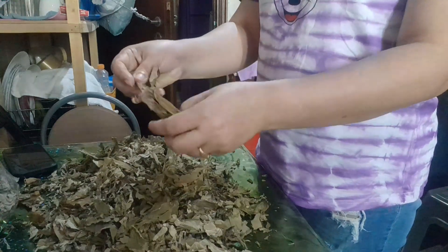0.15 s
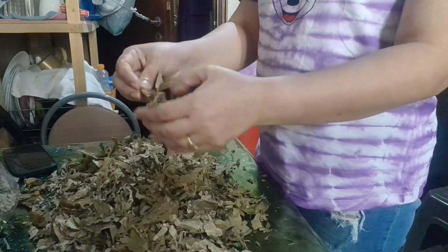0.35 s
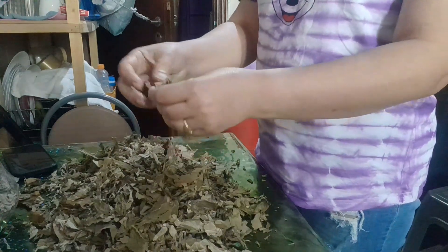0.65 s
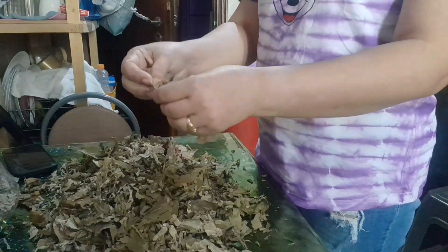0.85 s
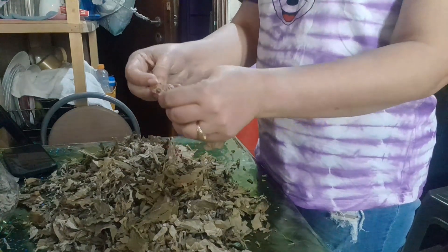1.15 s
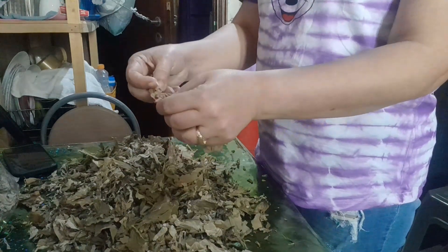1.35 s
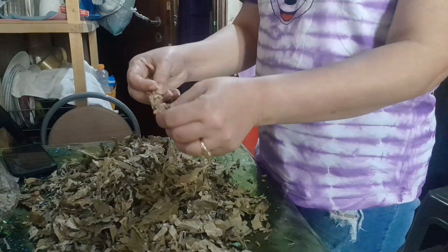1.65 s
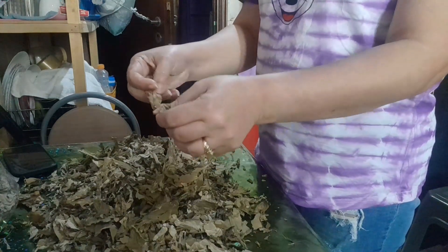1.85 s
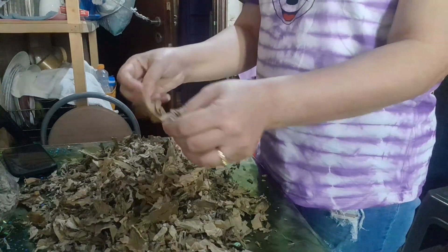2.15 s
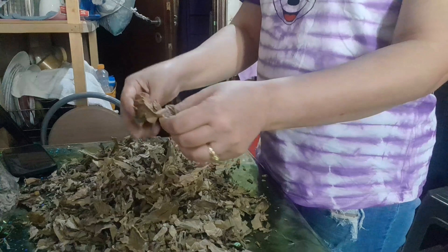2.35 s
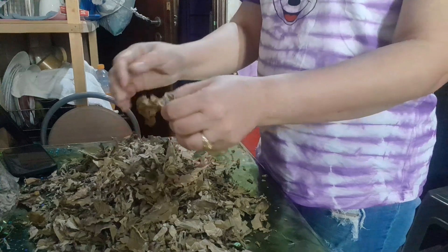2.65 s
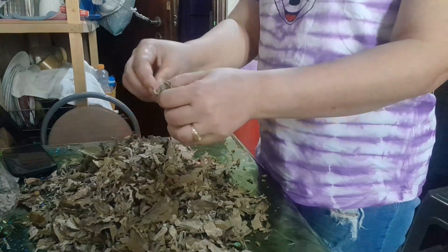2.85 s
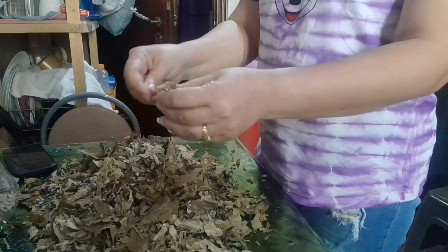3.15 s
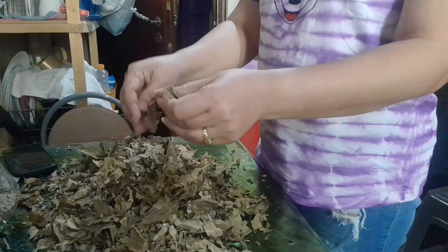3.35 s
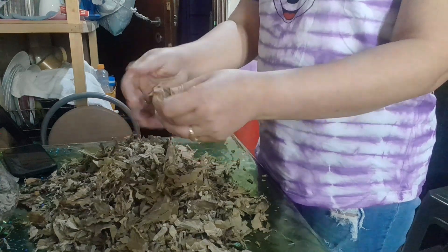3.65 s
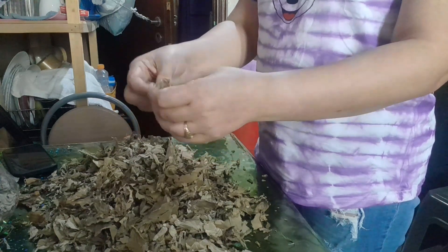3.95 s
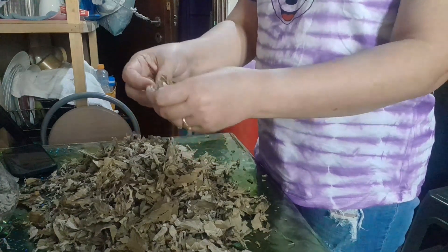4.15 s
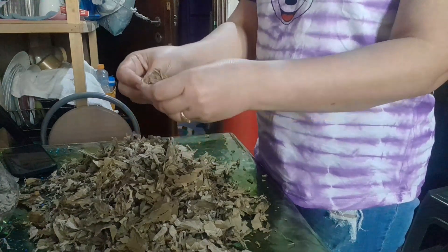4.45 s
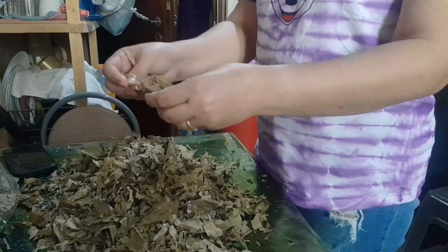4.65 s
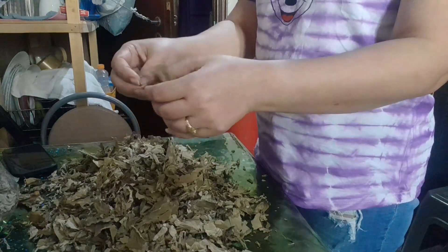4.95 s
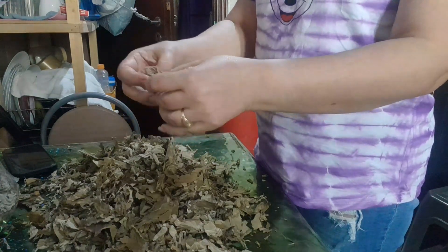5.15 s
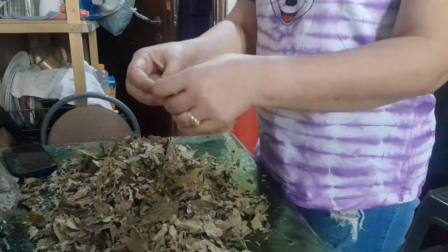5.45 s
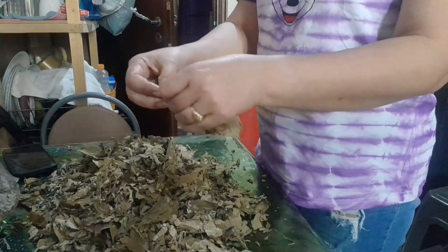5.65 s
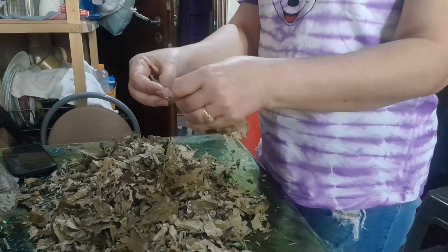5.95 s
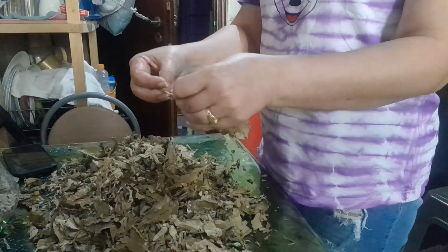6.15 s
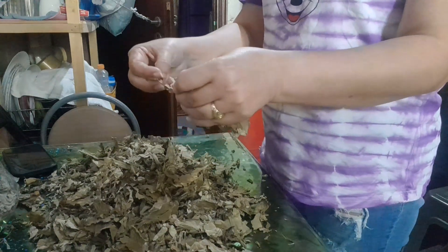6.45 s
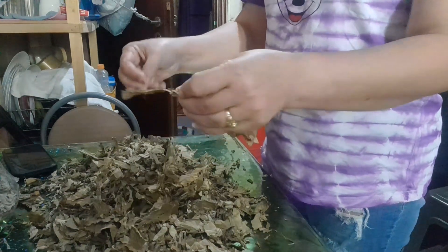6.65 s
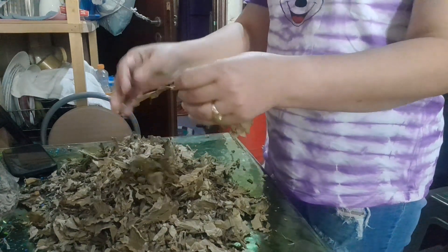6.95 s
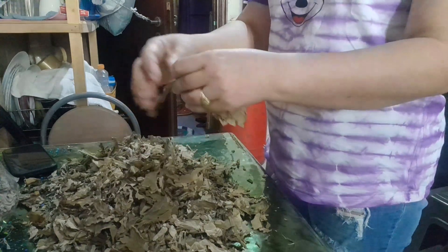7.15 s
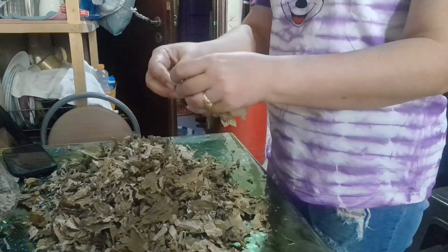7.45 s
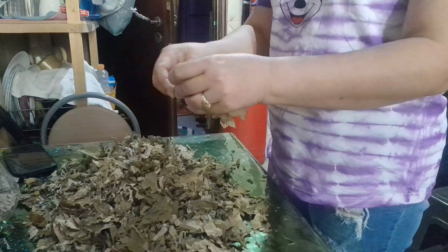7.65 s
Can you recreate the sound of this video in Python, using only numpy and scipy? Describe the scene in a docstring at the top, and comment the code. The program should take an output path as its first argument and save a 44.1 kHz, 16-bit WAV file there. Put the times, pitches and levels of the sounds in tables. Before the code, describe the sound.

Close to the microphone, fingers knead and tear dry leaves over a heap. Sharp vein snaps start at once, then bright crackling swells into short tearing pulls, with a dense crunchy burst near two seconds. Quieter rustling and soft rubbing follow, then more snaps, crunches and rips. A fan drones low throughout in a small, hard kitchen.

```python
"""Dry leaves are torn and crumbled by hand over a heap on a kitchen table, close to the microphone.
A fan drones low throughout; at once the fingers knead the leaf and the first veins snap in sharp cracks.
Pulls follow, each building up a swarm of tiny random cracks until the brittle blade parts.
Later, dull grainy swishes rub off crumbs, sudden rips burst out and folded wads crunch, among more kneading
and pulls to the end. Shaped noise makes every sound, and the small hard room answers every crack."""
import sys
import numpy as np
from scipy import signal
from scipy.fft import rfft, irfft, next_fast_len
from scipy.io import wavfile

SR = 44100
rng = np.random.default_rng(int(sys.argv[2]) if len(sys.argv) > 2 else 0)


def transcribe(u):
    """Save the signal u as a 16-bit wav file named by the first command-line argument.

    u: samples, shape (n,) or (channels, n), limited to [-1, 1]; the rate is SR.
    q: integer samples, one column per channel.
    """
    v = np.clip(np.atleast_2d(u).T, -1, 1)
    q = np.round(v * 32767).astype(np.int16)
    wavfile.write(sys.argv[1], SR, q)


N = 343539
TIME = np.arange(N) / SR
PADDED = next_fast_len(N + SR, True)
BINS = np.arange(PADDED // 2 + 1) * SR / PADDED   # frequencies of the spectrum [Hz]

# All levels in the tables are relative: later gains set the balance.
# Spectrum of the fan's rumble: (frequency [Hz], level [dB])
FAN_SPECTRUM = [(12, -45), (20, -19.5), (59, -15.5), (82, -7.5), (123, 4), (166, -7.5), (235, -11),
                (256, -15.5), (383, -29.5), (410, -27), (448, -28.5), (489, -28.5), (718, -26), (1000, -25),
                (1300, -37), (1690, -76.5), (2860, -120)]
# Spectrum of the hiss of air: (frequency [Hz], level [dB])
AIR_SPECTRUM = [(900, -20), (1200, 5), (1500, 6.5), (2000, -5), (3000, -32), (6000, -10), (15000, -5.5)]
# Room resonances fed by the fan: (frequency [Hz], width [Hz], level [dB])
ROOM_MODES = [(96.6, 18.8, -47.5), (113, 13, -63.5), (125.8, 13.5, -54.5), (147.7, 4.7, -52.5),
              (183.2, 5.6, -56), (227.7, 8.8, -56), (288.4, 6.6, -64.5), (304, 12, -69.5), (367.6, 54, -68)]
# Left-right likeness of the diffuse field: (frequency [Hz], likeness [1 = alike])
FIELD_LIKENESS = [(40, 1), (150, 0.94), (300, 0.73), (600, 0.55), (1200, 0.061), (4000, 0.32)]
# Decay of the kitchen's echoes: (frequency [Hz], reverberation time [s])
REVERBERATION = [(300, 0.25), (2000, 0.39), (6000, 0.32), (15000, 0.24)]
# Left-right difference of the microphone ports: (frequency [Hz], level [dB])
PORT_DIFFERENCE = [(1000, -0.5), (2500, -0.5), (5000, -0.5), (9000, 3.0), (13000, -5.5), (16000, -2.0)]
# Fingers rubbing crumbs off:
# (time [s], rise [s], hold [s], fade [s], swish level [dB], level of the chafed edge's ring [dB])
RUBBING = [(1.828, 0.06, 0.025, 0.038, -65, -62), (2.444, 0.075, 0.037, 0.047, -58, -62.5),
           (3.103, .015, 0.027, .015, -61, -73), (3.243, 0.019, 0.039, .04, -54, -68.5),
           (5.398, 0.026, 0.066, 0.097, -76, -70.5), (6.968, .018, 0.032, 0.034, -68.5, -90)]
# Spectrum of the sliding skin: (frequency [Hz], level [dB])
SKIN_SPECTRUM = [(150, -18), (400, 3.5), (900, 5.5), (1500, 2.5), (2100, -12.5), (3000, -24.5), (6000, -27),
                 (15000, -41)]
# Folded wads giving way: (time [s], fade [s], level [dB])
WAD_CRUNCHES = [(1.953, 0.019, -39), (4.121, 0.019, -38.5), (4.554, 0.023, -39.5), (6.104, 0.027, -50)]
# Spectrum of the crushed wad: (frequency [Hz], level [dB])
WAD_SPECTRUM = [(100, -17.5), (200, 1.5), (320, 4), (450, 1), (700, -4), (1100, -1), (1500, -2.5),
                (1900, 1), (2400, -2.5), (4500, -5), (6500, -9.5), (15000, -19)]
# Veins snapping: (time [s], peak level [dB], blade share [dB], blade pitch [Hz],
# pitch of the broken edge [Hz], left-right difference [dB])
VEIN_SNAPS = [(0.017, -37, -16, 3140, 4980, 4), (0.0383, -38, -15, 1200, 12600, -2),
              (0.0803, -24, -11.5, 2200, 5300, -1), (.852, -34, -17, 1840, 12700, -1),
              (1.0916, -51, -26, 2800, 11800, -4), (1.159, -35.5, -9, 3130, 4700, -6),
              (1.4683, -35, -38, 2800, 13800, -6), (1.7771, -35, -22.5, 2400, 13700, 3),
              (1.9229, -31, -16, 3500, 4200, -2), (1.932, -32, -27, 3050, 9300, -9),
              (1.947, -23.5, -27, 1170, 10600, -1), (1.9571, -32, -25, 2040, 14500, -11),
              (1.988, -26.5, -36, 2960, 13200, 3), (2.165, -34, -22, 3270, 11800, -1),
              (2.3542, -50.5, -28, 1220, 7640, -4), (3.094, -29, -25, 2880, 14300, -0.5),
              (4.317, -39, -6.5, 2330, 11900, 5), (4.3845, -32.5, -25, 1300, 8300, -2),
              (4.554, -31, -12, 1140, 4200, 4), (4.561, -34, -15, 2850, 13700, -9),
              (4.648, -30.5, -16.5, 3130, 5900, 0.5), (5.682, -41, -40, 1290, 12100, 0),
              (5.7788, -41, -13.5, 3130, 13400, -1), (6.043, -47, -19, 1280, 14400, -2),
              (6.1046, -35, -23, 3380, 4730, -2), (6.5425, -25, -41, 3480, 14300, 1.5)]
# Spectrum of the blade's knock as a vein snaps: (frequency [Hz], level [dB])
KNOCK_SPECTRUM = [(300, 14), (700, -22), (1100, 4.5), (1450, 2), (1900, 4.5), (2300, 0.5), (2800, 8.5),
                  (3600, -3.5), (5000, -13.5), (8000, -46), (15000, -37)]
# Fingers kneading and folding the leaf:
# (time [s], length [s], fine cracking level [dB], flexing level [dB])
KNEADING = [(-.02, 0.12, -50, -48), (0.167, 0.13, -49, -55), (0.354, 0.12, -60.5, -60.5),
            (0.595, 0.074, -55, -58), (0.686, 0.16, -49.5, -50.5), (0.939, 0.17, -52.5, -53.5),
            (1.195, 0.079, -55, -48), (1.292, 0.25, -63, -63), (2.369, 0.045, -60.5, -62),
            (2.495, .12, -61, -63.5), (2.868, 0.25, -54, -60), (3.087, 0.05, -53, -52),
            (3.327, .06, -69.5, -81), (3.587, 0.25, -66, -75), (3.841, 0.11, -58, -66.5),
            (3.984, 0.28, -57.5, -60.5), (4.296, 0.12, -60, -54), (4.46, 0.08, -63, -61),
            (4.565, 0.054, -45, -47), (4.688, 0.18, -57, -61), (4.94, .04, -60, -66),
            (5.003, 0.234, -58.5, -64.5), (5.388, 0.071, -64, -65), (5.579, .18, -60, -62.5),
            (5.797, 0.13, -53, -57), (6.026, .06, -64.5, -64.5), (6.498, 0.044, -49.5, -71),
            (6.542, 0.015, -47, -46), (6.975, 0.053, -64.5, -78), (7.05, 0.47, -70, -85),
            (7.336, 0.36, -57.5, -65), (7.7, 0.17, -54.5, -65.5)]
# Pulls that build up until the blade parts:
# (time [s], build-up [s], fine cracking level [dB], flexing level [dB])
BLADE_PULLS = [(.49, 0.063, -49, -52), (1.11, 0.083, -42, -45), (1.455, 0.089, -37, -46),
               (1.675, 0.06, -45.5, -53.5), (2.1, 0.063, -44.5, -51), (2.92, 0.083, -50.5, -56.5),
               (5.23, 0.061, -50, -53.5), (5.475, .04, -55.5, -59), (6.067, 0.085, -36.5, -48),
               (6.27, 0.12, -37.5, -51.5), (6.735, 0.065, -58, -93), (7.63, 0.056, -48, -69)]
# Sudden rips: (time [s], length [s], fine cracking level [dB], flexing level [dB])
SUDDEN_RIPS = [(1.929, 0.061, -43.5, -45), (4.546, 0.024, -39.5, -49), (6.101, 0.034, -43, -46),
               (6.542, .02, -40, -53)]
# Spectrum of a crack at the torn edge: (frequency [Hz], level [dB])
CRACK_SPECTRUM = [(880, -14), (1500, -16), (1940, -11.5), (2140, -35), (2590, -14), (2830, -6), (3480, -5),
                  (3920, -2.5), (5440, 0), (6430, 0), (9010, 1.5), (9850, -2), (13000, 2), (15100, 1),
                  (16000, -19)]
# Spectrum of the bending blade: (frequency [Hz], level [dB])
BLADE_SPECTRUM = [(150, -29), (300, 1), (440, 6), (650, 2), (1000, 4.5), (1400, -1), (1900, 1), (2300, 2),
                  (2850, 4), (3500, 0.5), (4800, 4), (7000, -11), (15000, -12.5)]

CUTOFF_HZ = 16000
CHAFE_HZ, CHAFE_WIDTH_HZ = 1970, 350   # ring of the rubbed edge
GRIP_S, RELEASE_S = 0.0067, 0.02   # attack and release of a kneading stroke
HELD_FINE_DB, HELD_FLEX_DB = -77, -80.5   # the leaf creaks while it is merely held
UNEVEN_DB, UNEVEN_HZ = 2.5, 7.6   # the finger pressure wavers
PULL_CURVE, SLACK_S = 0.72, 0.02   # cracking grows as this power of the stretch, then slackens
TICKS_PER_S, TICK_DB = 45, -11   # single fibres part; mean level against the swarm of cracks


def from_db(db):
    """Logarithmic level: decibels to an amplitude gain."""
    return 10 ** (np.asarray(db) / 20)


def rms_one(x):
    """Normalization: scale to unit root-mean-square."""
    return x / np.sqrt(np.mean(x ** 2) + 1e-20)


def at_hz(points, hz):
    """Logarithmic pitch scale: interpolate a table along log frequency."""
    f, value = np.transpose(points)
    return np.interp(np.log(hz + 1), np.log(f + 1), value)


def filtered(x, response):
    """Linear filtering: multiply the spectrum by a frequency response."""
    return irfft(rfft(x, PADDED) * response, PADDED)[..., :N]


def colour(x, spectrum):
    """Minimum phase: a causal filter made by folding the cepstrum; it keeps the power of white noise."""
    log_gain = np.log(rms_one(from_db(at_hz(spectrum, BINS))))
    cepstrum = irfft(log_gain, PADDED)
    cepstrum[1:PADDED // 2] *= 2
    return filtered(x, np.exp(rfft(cepstrum[:PADDED // 2], PADDED)))


def drift(rate):
    """Slow fluctuation: low-passed noise of unit spread, at half amplitude response at the rate in Hz."""
    return rms_one(filtered(rng.standard_normal(N), 1 / (1 + (BINS / rate) ** 2)))


def panned(db):
    """Level difference between channels: split it evenly over the two gains."""
    return from_db(np.array([db, -db]) / 2).reshape(2, -1)


def fading(from_s, fade_s):
    """Exponential release: full level up to a moment, then decay."""
    return np.exp(-np.clip((TIME - from_s) / fade_s, 0, 20))


def resonate(x, hz, width_hz):
    """Damped mode: a two-pole resonance that keeps the power of white noise."""
    r = np.exp(-np.pi * width_hz / SR)
    poles = [1, -2 * r * np.cos(2 * np.pi * hz / SR), r * r]
    return signal.lfilter([1, 0, -1], poles, x) * np.sqrt((1 - r * r) / 2)


def diffuse_noise():
    """Diffuse field: white stereo noise is most alike in both channels where the waves are long."""
    alike = np.clip(at_hz(FIELD_LIKENESS, BINS), -.999, .999)
    mid = filtered(rng.standard_normal(N), np.sqrt(1 + alike))
    side = filtered(rng.standard_normal(N), np.sqrt(1 - alike))
    return np.array([mid + side, mid - side]) / np.sqrt(2)


def near_noise(size, alike=0.17):
    """Partial coherence: white noise from a near source, partly shared by the two channels."""
    alike = np.clip(alike, 0, 1)
    shared = rng.standard_normal(size)
    separate = rng.standard_normal((2, size))
    return np.sqrt(alike) * shared + np.sqrt(1 - alike) * separate


def fracture_power(per_s, spread_db, clump_db, ring_s):
    """Clustered random fracture: cracks of uneven size come in clumps and decay at once; mean power 1."""
    born = rng.random(N) < per_s * from_db(clump_db * drift(25)) / SR
    sizes = from_db(spread_db * np.minimum(rng.exponential(1, N), 3.5))
    power = born * sizes ** 2 / per_s
    power = signal.lfilter([1], [1, -np.exp(-1 / (ring_s * SR))], power + 1e-18)
    return power / power.mean()


def fan():
    """Turbulence noise: a broad rumble, lifted at the room's resonances, under a faint hiss of air."""
    modes = 0
    for hz, width, db in ROOM_MODES:
        modes = modes + from_db(db) * rms_one(1 / (1 + ((BINS - hz) / width) ** 2))
    resonant = from_db(-4.0) * filtered(diffuse_noise(), modes)
    rumble = from_db(-45) * colour(diffuse_noise(), FAN_SPECTRUM)
    hiss = from_db(-77.5) * colour(diffuse_noise(), AIR_SPECTRUM)
    return (resonant + rumble) * panned(-1.53) + hiss


def reflections(x, first_s, count=8):
    """Reverberant decay: dense echoes off walls and table fade at a rate set for each band."""
    t = np.arange(SR * 2 // 3) / SR
    edges, tail = np.geomspace(100, 18000, count + 1), 0
    for low, high in zip(edges, edges[1:]):
        band_pass = signal.butter(2, [low, high], "band", fs=SR, output="sos")
        band = signal.sosfilt(band_pass, rng.standard_normal((2, len(t))))
        decay_s = at_hz(REVERBERATION, np.sqrt(low * high))
        tail = tail + band * from_db(-60 * t / decay_s)
    onset = np.clip(t / first_s - .5, 0, 1)
    tail = rms_one(tail * onset) / np.sqrt(len(t))
    return filtered(x, rfft(tail, PADDED))


def kitchen(x):
    """Changing echo paths: the mix of two reflection patterns shifts as the hands move."""
    turn = 2 * drift(2.78)
    return sum(reflections(x * share, first_s=.005) for share in (np.cos(turn), np.sin(turn)))


def fingers():
    """Friction: skin catches on crumbs, slides with a dull grainy swish and lets go; the edge rings faintly."""
    swish, chafe = 0, 0
    for start, rise, hold, fade, swish_db, ring_db in RUBBING:
        stroke = np.clip((TIME - start) / rise, 0, 1) * fading(start + rise + hold, fade)
        swish = swish + from_db(swish_db) * stroke
        chafe = chafe + from_db(ring_db) * stroke
    grain = np.sqrt(fracture_power(780, spread_db=2.5, clump_db=2.0, ring_s=0.0015))
    sliding = colour(swish * grain * diffuse_noise(), SKIN_SPECTRUM)
    ringing = resonate(chafe * grain * near_noise(N), CHAFE_HZ, CHAFE_WIDTH_HZ)
    return sliding + ringing


def crunches():
    """Collapse under load: a folded wad gives way between the fingers with a dull, quickly fading crunch."""
    push = 0
    for s, fade, db in WAD_CRUNCHES:
        push = push + from_db(db) * (TIME >= s) * np.exp(-np.abs(TIME - s) / fade)
    grain = np.sqrt(fracture_power(1200, spread_db=7.5, clump_db=-1.0, ring_s=0.0022))
    return colour(push * grain * near_noise(N, alike=0.54), WAD_SPECTRUM)


def snaps(ring_s, after_s, after_db, count=3):
    """Brittle fracture: a sharp crack and a few mostly weaker ones set blade and broken edge ringing."""
    fine, flex = np.zeros((2, 2, N))
    t = np.arange(SR // 40) / SR
    for s, peak_db, blade_db, blade_hz, edge_hz, pan_db in VEIN_SNAPS:
        delays = np.r_[0, rng.uniform(0, after_s, count)][:, None]
        sizes = from_db(np.r_[0, rng.normal(after_db, 1, count)])[:, None]
        power = (t >= delays) * sizes ** 2 * np.exp(-np.abs(t - delays) / ring_s)
        shake = from_db(peak_db) * np.sqrt(np.sum(power, 0)) * panned(pan_db)
        crack, edge, blade = (shake * near_noise(len(t), alike=0.093) for _ in range(3))
        edge = resonate(edge, edge_hz, .25 * edge_hz)
        blade = resonate(blade, blade_hz, .6 * blade_hz)
        at = round(s * SR)
        fine[:, at:at + len(t)] += from_db(-2.0) * crack + from_db(-6.0) * edge
        flex[:, at:at + len(t)] += from_db(blade_db + 4.0) * blade
    return fine, flex


def veins():
    """Impulsive radiation: the crack at the broken edge and the blade's knock each have their spectrum."""
    crack, blade = snaps(ring_s=0.00052, after_s=0.0031, after_db=-8.0)
    return colour(crack, CRACK_SPECTRUM), colour(blade, KNOCK_SPECTRUM)


def handling():
    """Applied stress: kneading holds on, pulls swell and slacken, rips burst; their powers add."""
    strokes = [(1, HELD_FINE_DB, HELD_FLEX_DB)]
    pressure = from_db(UNEVEN_DB * drift(UNEVEN_HZ))
    for start, length, *levels in KNEADING:
        grip = np.clip((TIME - start) / GRIP_S, 0, 1) * fading(start + length, RELEASE_S)
        strokes.append((grip * pressure, *levels))
    for start, build_s, *levels in BLADE_PULLS:
        stretch = np.clip((TIME - start) / build_s, 0, 1)
        strokes.append((stretch ** PULL_CURVE * fading(start + build_s, SLACK_S), *levels))
    for start, length, *levels in SUDDEN_RIPS:
        burst = (TIME >= start) & (TIME < start + length)
        strokes.append((burst, *levels))
    fine = sum((shape * from_db(fine_db)) ** 2 for shape, fine_db, _ in strokes)
    flex = sum((shape * from_db(flex_db)) ** 2 for shape, _, flex_db in strokes)
    return np.sqrt(fine), np.sqrt(flex)


def crumbling():
    """Stress-driven fracture: the harder the pull, the faster the cracks; single fibres tick above them."""
    fine, flex = (from_db(-3.5) * level for level in handling())
    per_s = 660 * (fine / from_db(-62.0)) ** 0.26
    swarm = fracture_power(per_s, spread_db=-1.0, clump_db=5.0, ring_s=0.0014)
    ticks = fracture_power(TICKS_PER_S, spread_db=1, clump_db=2, ring_s=0.0007)
    shake = np.sqrt(swarm + from_db(TICK_DB) ** 2 * ticks)
    shake = shake * panned(3.1 * drift(160))   # every facet of the leaf faces another way
    return [level * shake * near_noise(N) for level in (fine, flex)]


def facets(x, patchy_db, count=16):
    """Shifting resonance: as the leaf changes shape, each range of pitches swells and fades on its own."""
    place = np.interp(np.log(BINS + 1), np.log([1200, 16000]), [0, count - 1])
    bands = (np.clip(1 - np.abs(place - k), 0, 1) for k in range(count))
    return sum(filtered(x, band) * from_db(patchy_db * drift(5.6)) for band in bands)


def leaf():
    """Radiation from a thin plate: the rustle is bright at the torn edge and lower in the bending blade."""
    fine, flex = crumbling()
    rustle = colour(fine, CRACK_SPECTRUM) + colour(flex, BLADE_SPECTRUM)
    return from_db(-1.5) * facets(rustle, patchy_db=1.5)


def scene():
    """Superposition: each part of the leaf faces the microphone and the walls to a different degree."""
    background = fan()
    rustle = fingers() + crunches() + leaf()
    crack, knock = veins()
    direct = from_db(-0.5) * rustle + from_db(-0.7) * crack + from_db(1.0) * knock
    to_walls = from_db(-2.02) * rustle + from_db(-2.5) * crack + from_db(-7.5) * knock
    return background + kitchen(to_walls) + direct


def record(dry):
    """Transducer response: the two microphone ports differ most in the treble, and the top is cut."""
    left_right_db = at_hz(PORT_DIFFERENCE, BINS)
    top = 1 / np.sqrt(1 + (BINS / CUTOFF_HZ) ** 200)
    return filtered(dry, panned(left_right_db) * top)


dry = scene()
out = record(dry)
transcribe(out)
```